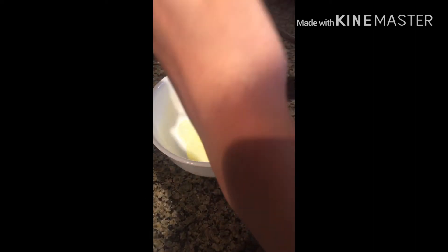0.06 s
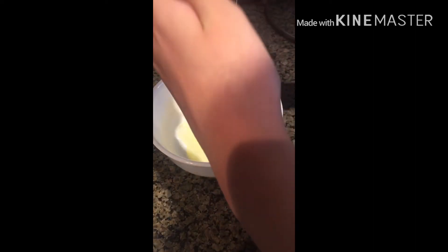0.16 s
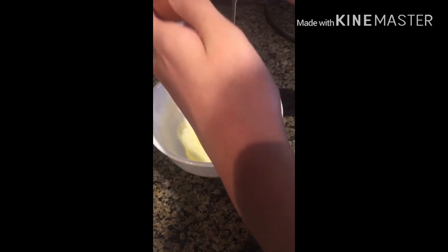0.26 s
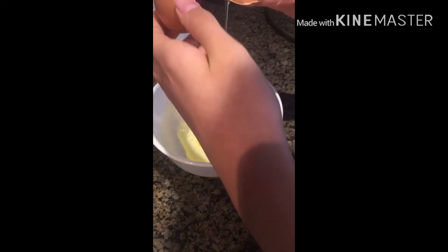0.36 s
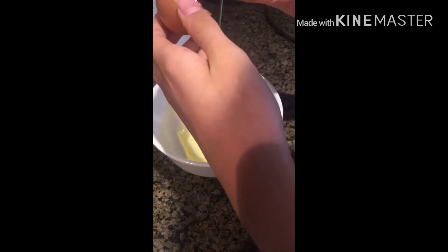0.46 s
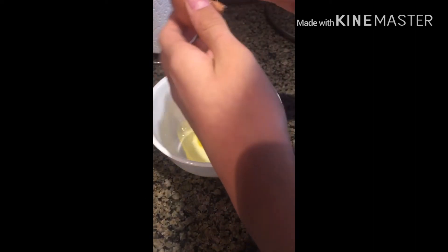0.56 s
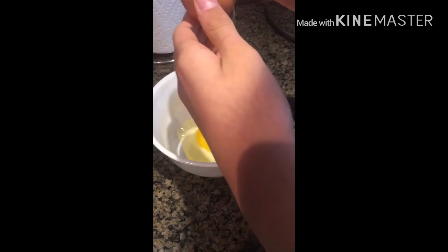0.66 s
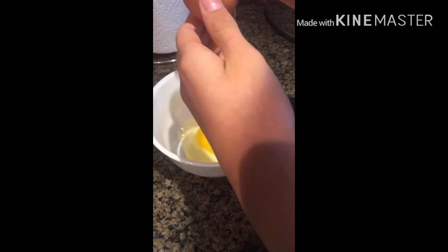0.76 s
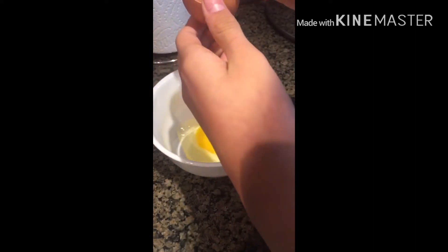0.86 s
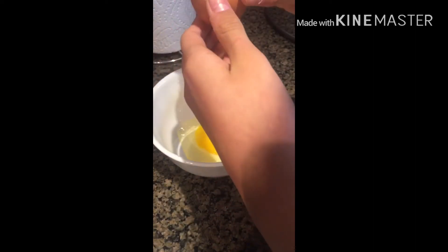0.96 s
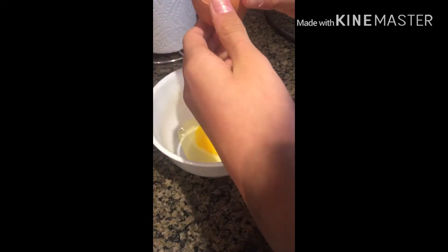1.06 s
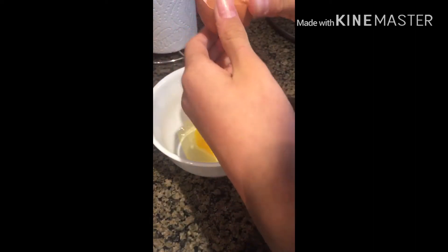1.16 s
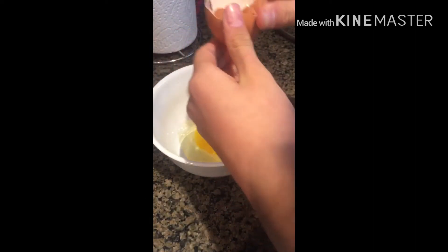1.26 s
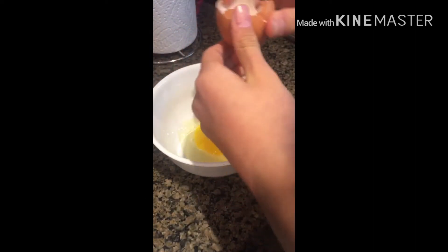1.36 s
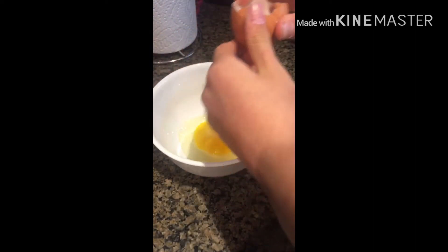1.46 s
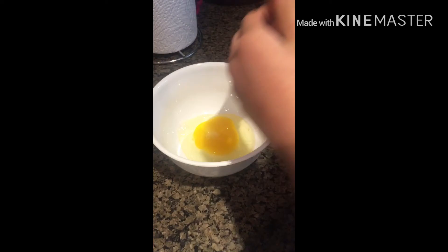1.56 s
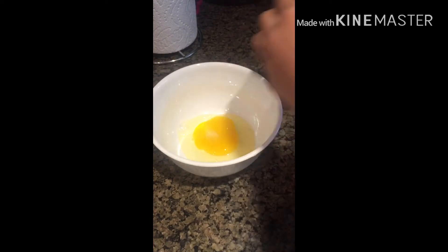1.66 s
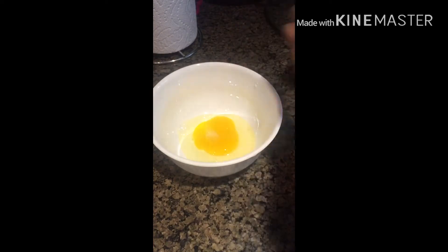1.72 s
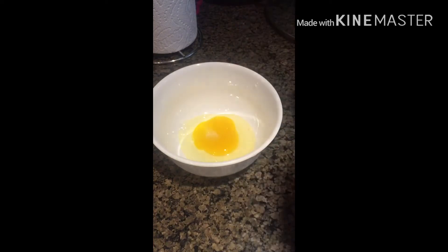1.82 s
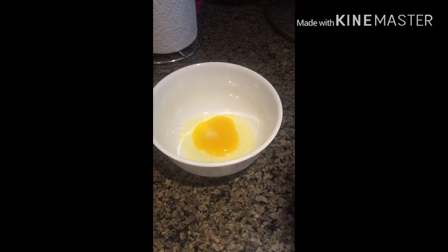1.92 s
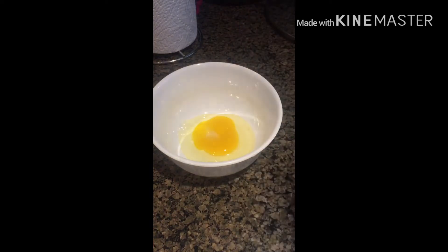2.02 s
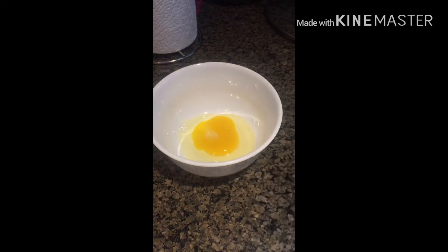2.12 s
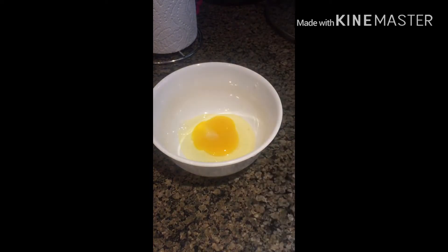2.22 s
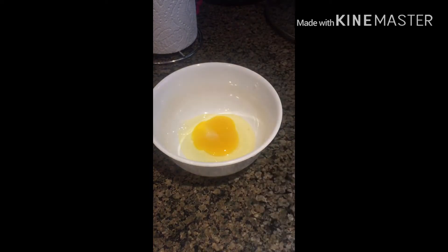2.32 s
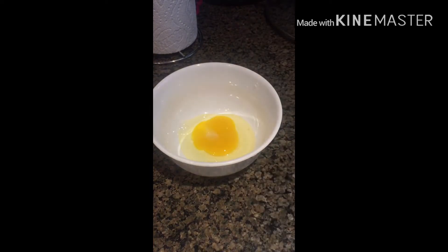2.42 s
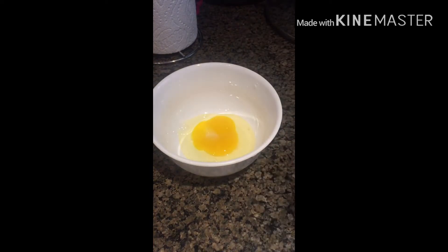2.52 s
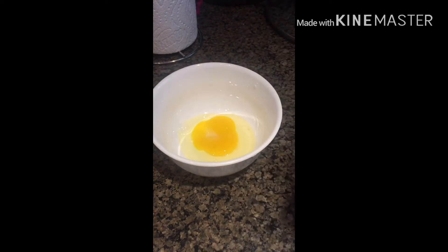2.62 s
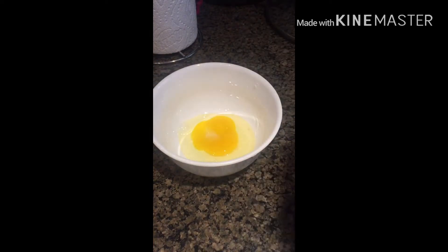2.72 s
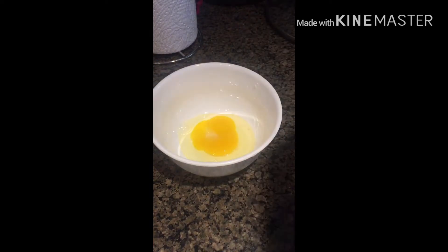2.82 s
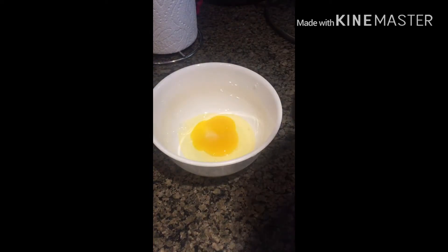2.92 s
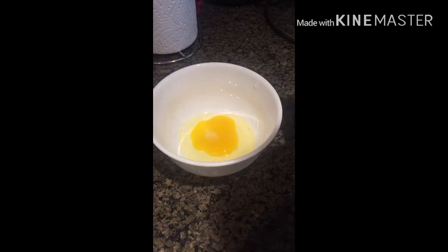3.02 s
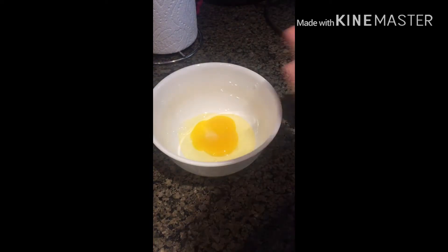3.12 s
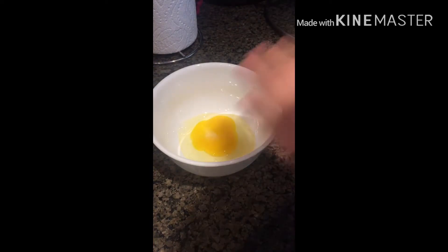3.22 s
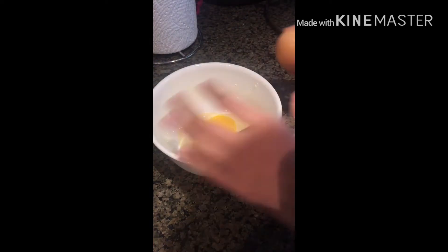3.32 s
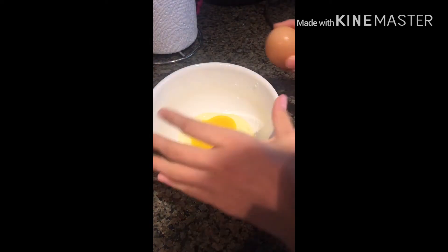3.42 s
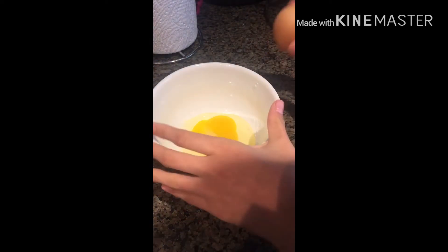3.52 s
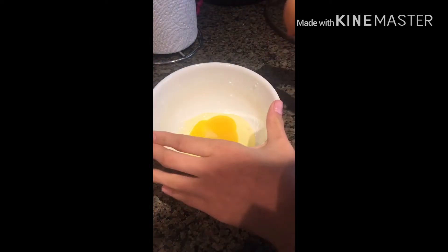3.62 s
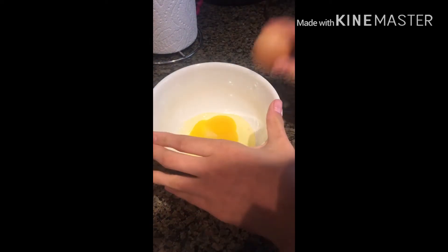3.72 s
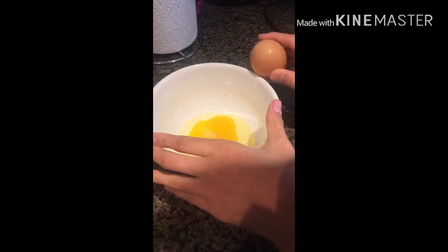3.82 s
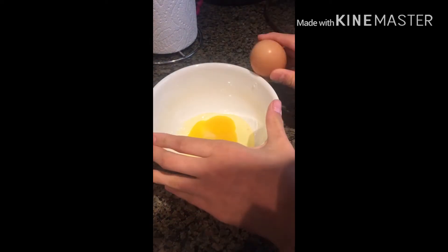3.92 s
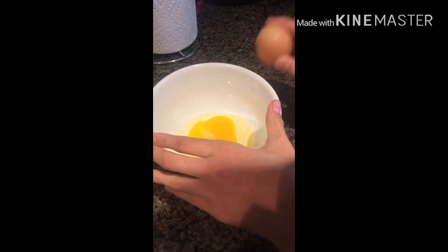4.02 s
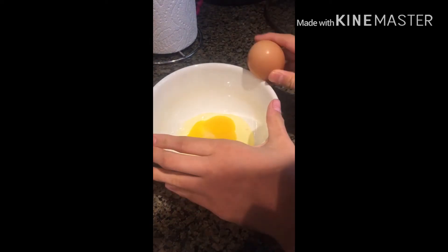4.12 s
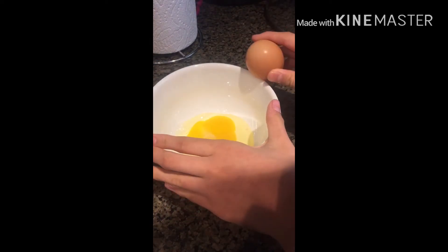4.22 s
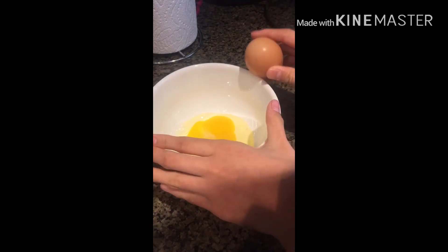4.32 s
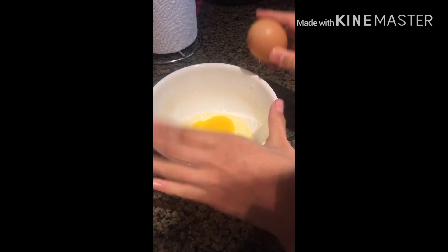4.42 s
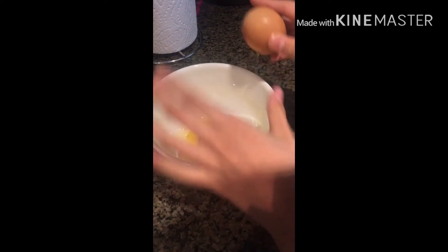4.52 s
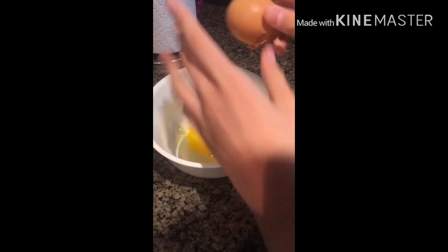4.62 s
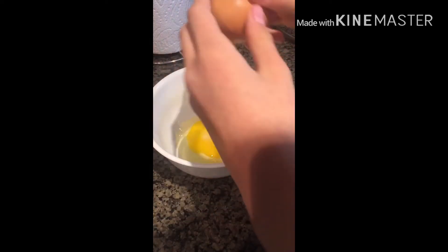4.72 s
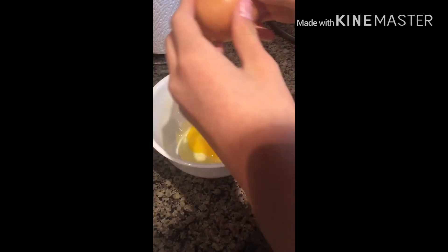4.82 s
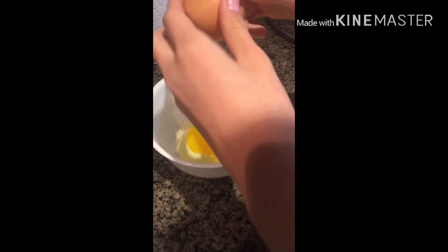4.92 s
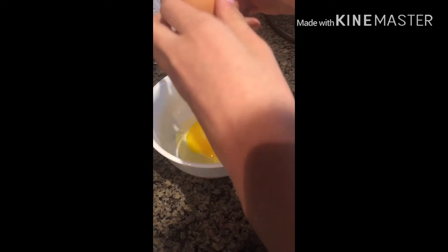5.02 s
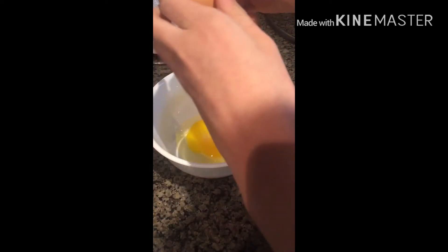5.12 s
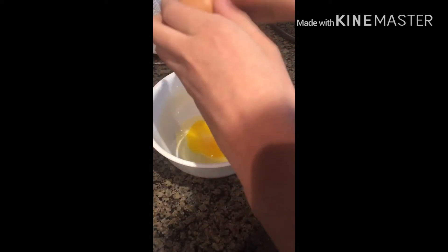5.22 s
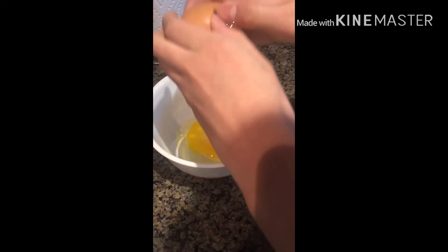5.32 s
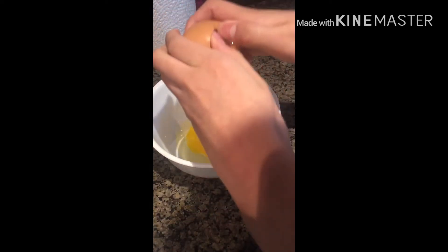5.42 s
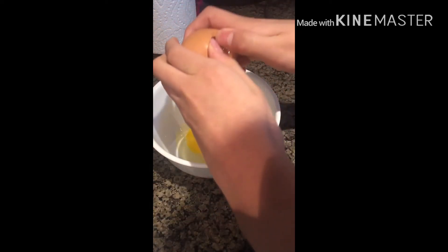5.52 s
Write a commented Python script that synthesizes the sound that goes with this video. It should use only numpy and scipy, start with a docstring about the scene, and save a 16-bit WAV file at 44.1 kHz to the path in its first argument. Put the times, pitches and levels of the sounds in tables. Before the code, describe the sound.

Eggshell is pried apart close up with brittle crackles, tossed aside with a clatter, then another egg is knocked twice on a ceramic bowl and opened.

```python
"""Cracking eggs over a bowl

Thumbs pry a shell apart close by: brittle breaks ring shell resonances and throw off bright splinters.
The empty shell is tossed aside: clacks and low thuds, then it rocks to rest. A second egg is knocked twice
on the hand-damped rim of a ceramic bowl (knock, crunch, ringing modes, counter boom) and pressed open.
Behind: sliding fingers, soft bumps, a clink, noise-built kitchen hum and hiss, short reverberation."""
import sys
import numpy as np
from scipy import signal
from scipy.fft import rfft, irfft, next_fast_len
from scipy.io import wavfile
from scipy.ndimage import map_coordinates

SR = 44100
rng = np.random.default_rng(int(sys.argv[2]) if len(sys.argv) > 2 else 0)


def transcribe(signal):
    """Save signal, clipped to [-1, 1], as a 16-bit WAV file at the path in sys.argv[1]."""
    frames = np.atleast_2d(signal).T
    limited = np.clip(frames, -1, 1)
    pcm = np.round(limited * 32767).astype(np.int16)
    wavfile.write(sys.argv[1], SR, pcm)


N = 245637
SIZE = 32768  # samples in one event
T = np.arange(SIZE) / SR
HZ = np.fft.rfftfreq(SIZE, 1 / SR)

# resonances of the opened shell, a hollow cup: [f/Hz, width/Hz, level/dB]
OPEN_SHELL = [(1028, 300, -16), (1783, 270, -5.5), (2210, 160, 2.5), (2570, 130, -1.5), (3120, 370, -5),
              (4200, 500, -13.5)]
# resonances of the splinters: [f/Hz, width/Hz, level/dB]
SPLINTER = [(5240, 530, -1.5), (6650, 940, 0), (8200, 150, 2), (9100, 860, -5), (14000, 2200, -12.5)]
# boom of the counter: [f/Hz, width/Hz, level/dB]
COUNTER = [(59.7, 20, -6.5), (91, 11, 7), (109, 16, -5.5)]


def amp(db):
    """Decibels to gain."""
    return 10 ** (np.asarray(db) / 20)


def unit(x):
    """Scale to rms 1."""
    return x / np.sqrt(np.mean(x ** 2) + 1e-20)


def blow(x):
    """Scale a transient to the energy of 3 ms at rms 1."""
    return x * np.sqrt(.003 * SR / (np.sum(x ** 2) + 1e-20))


def along(points, hz):
    """Read (f/Hz, value) points on a log-frequency axis."""
    f, v = np.transpose(points)
    return np.interp(np.log(hz + 1), np.log(f + 1), v)


def curves(rows):
    """One value per sample for each column after the time."""
    s, *cols = np.transpose(rows)
    return [np.interp(np.arange(N) / SR, s, c) for c in cols]


def wobble(rate_hz):
    """Smooth random curve with rate_hz knots a second."""
    knots = rng.standard_normal(int(N * rate_hz / SR) + 4)
    return map_coordinates(knots, [np.arange(N) * rate_hz / SR])


def add(track, s, sound):
    """Mix a sound into the track at time s."""
    part = track[max(round(s * SR), 0):][:len(sound)]
    part += sound[:len(part)]


def noise(spectrum):
    """Steady Gaussian noise of rms 1, coloured by (f/Hz, dB) points."""
    m = next_fast_len(N + 8192)
    white = rfft(rng.standard_normal(m))
    colour = amp(along(spectrum, np.fft.rfftfreq(m, 1 / SR)))
    return unit(irfft(white * colour, m)[:N])


def body(modes, pitch=1):
    """Causal response of parallel resonances of alternating sign, all shifted by pitch."""
    f = HZ / pitch
    return sum((-1) ** k * amp(db) * 1j * f * width / (centre * centre - f * f + 1j * f * width)
               for k, (centre, width, db) in enumerate(modes))


def causal(spectrum):
    """Minimum-phase response with the given colour, by folding the cepstrum."""
    cepstrum = irfft(np.log(amp(along(spectrum, HZ))))
    cepstrum[1:SIZE // 2] *= 2
    cepstrum[SIZE // 2 + 1:] = 0
    return np.exp(rfft(cepstrum))


def tilt(db_per_octave, centre_hz):
    """Small pieces and hard contacts drive higher modes more: slope from 1.6 to 4 kHz, level beyond."""
    return causal([(f, db_per_octave * np.log2(f / centre_hz)) for f in (1600, 4000)])


def small(edge_hz):
    """A small object radiates little below its edge: second-order high-pass."""
    return (1j * HZ / (edge_hz + 1j * HZ)) ** 2


def fracture(crumble_s, spiky_db=7, lead=.6):
    """Force of a fracture: one break, then a dying train of uneven micro-breaks."""
    crumble_s = max(crumble_s, 1e-4)
    spikes_db = spiky_db * np.repeat(rng.standard_normal(SIZE // 8), 8)
    breaks = rng.standard_normal(SIZE) * amp(spikes_db)
    force = breaks * np.exp(-(T / crumble_s) ** 2)
    force /= np.linalg.norm(force)
    force[0] += lead * (0.0023 / crumble_s) ** 1.6  # a quick fracture is nearly one clean snap
    return force


def running_crack(rise_s, fall_s):
    """Force of a crack running in uneven steps that swell to the main break, then die away."""
    crumble_s = .0034
    swell_db_per_s, end_db = 850, -19
    jitter, scatter_db = .22, 1.5  # timing jitter as a share of the step spacing
    steps = [(rise_s * k / 3, rise_s / 3) for k in range(3)]
    steps += [(rise_s, 0)]
    steps += [(rise_s + fall_s * (k + 1) / 6, fall_s / 6) for k in range(6)]
    force = np.zeros(SIZE)
    for (s, spacing_s), (late, uneven) in zip(steps, rng.standard_normal((len(steps), 2))):
        db = np.interp(s, [0, rise_s, rise_s + fall_s], [-swell_db_per_s * rise_s, 0, end_db])
        db += scatter_db * uneven
        step = blow(fracture(crumble_s, spiky_db=6.5, lead=1.5))
        add(force, s + jitter * spacing_s * late, amp(db) * step)
    return force


def struck(force, response):
    """A force passing through a resonating body, faded to silence and energy-scaled."""
    return blow(irfft(rfft(force) * response) * np.cos(np.pi / 2 * T / T[-1]) ** 2)


def thump(modes, contact_s=.004):
    """A soft push, an exponentially dying force, sets a body booming."""
    return struck(np.exp(-T / max(contact_s, 1e-4)), body(modes) * small(45))


def ring(modes, scatter_db=1):
    """Decaying sine modes of ceramic, at slightly new strengths each time."""
    total = 0
    for hz, t60_s, db in modes:
        level_db = db + scatter_db * rng.standard_normal() - 60 * T / t60_s
        total = total + amp(level_db) * np.sin(2 * np.pi * hz * T)
    return blow(total)


def echo(x, decay, build_s, size):
    """Convolve with fresh diffuse noise that builds up, then dies at each frequency's own t60."""
    hz, t, z = signal.stft(rng.standard_normal(size), SR, nperseg=256)
    z = z * np.exp(-np.log(1000) * t / along(decay, hz)[:, None])
    tail = signal.istft(z, SR, nperseg=256)[1][:size]
    tail = tail * (1 - np.exp(-T[:size] / build_s))
    return signal.fftconvolve(x, tail / np.linalg.norm(tail))[:SIZE]


def placed(x, near_db, room_db):
    """Direct sound, scatter from nearby surfaces and the kitchen's reverberation."""
    # counter, hands and bowl wall: [f/Hz, t60/s]
    nearby = [(200, 0.11), (2500, 0.058), (14000, 0.046)]
    # kitchen: [f/Hz, t60/s]
    kitchen = [(100, 0.35), (500, 0.71), (2300, .57), (4000, .6), (6500, .5), (10000, .33), (16000, 0.18)]
    scatter = echo(x, nearby, build_s=0.0023, size=4096)
    reverb = echo(x, kitchen, build_s=0.01, size=28672)
    return x + amp(near_db) * scatter + amp(room_db) * reverb


def prying(snaps, cracks, shell, centre_hz, near_db, room_db):
    """Each fracture rings the shell's fixed modes, tilted by its pitch, and throws off bright splinters."""
    snap_crumble_s, slower_s_per_db = .0006, .00008  # weaker snaps crumble for longer
    out = np.zeros(N)
    cup = body(shell) * small(200)
    splinters = body(SPLINTER) * small(2500)
    breaks = []
    for s, ring_db, splinter_db, hz in snaps:
        force = fracture(snap_crumble_s - slower_s_per_db * ring_db, spiky_db=7.0, lead=1.4)
        breaks.append((s, force, ring_db, splinter_db, hz))
    for s, rise_s, fall_s, *rest in cracks:
        breaks.append((s, running_crack(rise_s, fall_s), *rest))
    for s, force, ring_db, splinter_db, hz in breaks:
        favour = tilt(40 * np.log2(hz / centre_hz), centre_hz)
        snap = amp(ring_db) * struck(force, cup * favour)
        snap += amp(splinter_db) * struck(force, splinters)
        add(out, s, placed(snap, near_db, room_db))
    return out


def first_egg():
    """The first shell, pried open: a hollow cup with ringing modes."""
    # single snaps: [t/s, shell ring level/dB, splinter level/dB, pitch f/Hz]
    snaps = [(.1333, -32.5, -40, 3050), (.1616, -41.5, -32.5, 3000), (.319, -39, -43, 2860),
             (.601, -21.5, -29, 2690), (.6283, -35.5, -36, 2600), (.6487, -22, -28, 2406),
             (.6935, -28, -37, 2200), (.7768, -25.5, -38, 2577), (.867, -38.5, -47, 2874),
             (.9393, -21, -31, 2310), (1.069, -22, -26, 2350), (1.086, -19, -30.5, 2170),
             (1.135, -18, -20.5, 2284), (1.163, -30, -31.5, 2368), (1.188, -27.5, -28.5, 2470),
             (1.2017, -20.5, -33.5, 2260), (1.224, -32.5, -37, 2350), (1.2578, -14.5, -26, 2430),
             (1.3143, -10, -21.5, 2420), (1.378, -39.5, -36, 2350), (1.507, -44, -42, 2830),
             (1.7704, -43, -52.5, 2183)]
    # running cracks: [t/s, rise/s, fall/s, shell ring level/dB, splinter level/dB, pitch f/Hz]
    cracks = [(.661, .007, .011, -20, -39, 2330), (.711, .009, .04, -20, -39.5, 2280),
              (.889, .0185, .042, -11.5, -14.8, 2680), (1.104, 0.0091, .021, -16.5, -20.5, 2300),
              (1.242, .004, .014, -10, -8.5, 2400), (1.2814, .0063, .019, -5.5, -8, 2630)]
    return prying(snaps, cracks, OPEN_SHELL, centre_hz=2480, near_db=-7.5, room_db=-23)


def second_egg():
    """The second shell, pressed open: its contents damp the modes."""
    # single snaps: [t/s, shell ring level/dB, splinter level/dB, pitch f/Hz]
    snaps = [(5.06, -49, -42, 2590), (5.112, -41, -45, 3000), (5.178, -37.5, -37, 3230),
             (5.202, -23.5, -17, 3054), (5.2216, -19, -19.5, 3296), (5.421, -35.5, -33.5, 3800)]
    # running cracks: [t/s, rise/s, fall/s, shell ring level/dB, splinter level/dB, pitch f/Hz]
    cracks = [(5.125, .003, .005, -31, -25.5, 3535), (5.193, .009, .024, -20, -21, 3300)]
    # resonances of the full shell: [f/Hz, width/Hz, level/dB]
    full_shell = [(308, 60, 0), (1380, 830, -3), (2270, 470, -1.5), (3640, 820, 1)]
    return prying(snaps, cracks, full_shell, centre_hz=3200, near_db=-7.5, room_db=-24.5)


def ticks(count=7):
    """Tiny random breaks, count of them spread over each spell of pressing."""
    # thumbs pressing: [start t/s, end t/s, level/dB]
    pressing = [(.02, .58, -51.5), (0.799, 1.099, -47), (5.05, 5.451, -55)]
    scatter_db = 3
    out = np.zeros(N)
    colour = body(OPEN_SHELL) * small(250) + amp(-4) * body(SPLINTER) * small(2500)
    for start, end, db in pressing:
        for k in range(count):
            s = start + (end - start) * (k + rng.random()) / count
            level = amp(db + scatter_db * rng.standard_normal())
            add(out, s, level * struck(fracture(.004, spiky_db=6, lead=1), colour))
    return out


def tossed_shell():
    """The empty shell hits, tumbles and rocks to rest in a boomy hollow."""
    # contacts: [t/s, clack level/dB, crumbling time/s, thud level/dB, hardness tilt/(dB/octave)]
    landing = [(2.4225, -33.5, .0033, -55, 0), (2.426, -4.5, 0.0021, -31, 4), (2.4288, -6, .006, -25, 4),
               (2.4387, -16.5, .005, -43, 2), (2.4515, -21, 0.0082, -17, -3),
               (2.462, -8, 0.0055, -16.5, -2.5), (2.4706, -8, .0045, -19, -2),
               (2.4755, -9.5, .0027, -18.5, -1)]
    # resonances of shell and hollow: [f/Hz, width/Hz, level/dB]
    clack_modes = [(617, 160, -14.5), (915, 140, -12), (1304, 170, -11), (1700, 97, -0.5), (2105, 130, 0.5),
                   (2320, 130, -0.5), (2660, 180, -0.5), (3130, 140, -5), (3380, 300, -3), (4240, 810, -10),
                   (5600, 820, -11), (8500, 3500, -20.5), (12400, 6500, -24)]
    # boom of the hollow: [f/Hz, width/Hz, level/dB]
    thud_modes = [(55.1, 16, -1.5), (81.9, 15, -3), (104, 16, -4.5), (156, 37, -10), (308.5, 50, -10),
                  (422, 79, -12.5)]
    rock_gap_s, rock_crumble_s = .027, 0.007
    rock_clack_db, rock_thud_db, rock_loss_db = -31, -28, 4  # first contact, loss per further one
    out = np.zeros(N)
    colour = body(clack_modes) * small(250)
    rocking = []
    for k in range(8):
        s = landing[-1][0] + rock_gap_s * (k + 1)
        loss_db = rock_loss_db * k
        rocking.append((s, rock_clack_db - loss_db, rock_crumble_s, rock_thud_db - loss_db, 0))
    for s, clack_db, crumble_s, thud_db, hardness in [*landing, *rocking]:
        force = fracture(crumble_s, spiky_db=4, lead=.9)
        clack = amp(clack_db) * struck(force, colour * tilt(hardness, centre_hz=2500))
        thud = amp(thud_db) * thump(thud_modes, contact_s=0.00022)
        add(out, s, placed(clack + thud, near_db=-7.5, room_db=-15))
    return out


def bowl(spot):
    """The bowl's ring; mode strengths depend on where between two rim spots it is struck."""
    # ring modes: [f/Hz, t60/s, level at spot 0/dB, level at spot 1/dB]
    modes = [(855, .22, -4, -1), (1388, .55, 1, -9), (2543, .55, -24, 1), (2584, .5, -9, -12),
             (4075, .42, -5, -4), (5640, .25, -14, -14), (5950, .28, -10, -7), (6230, .22, -15, -9),
             (7900, .15, -19, -13), (10030, .22, -21, -12), (11110, .2, -16, -11), (12870, .2, -30, -14)]
    return ring([(hz, t60_s, np.interp(spot, [0, 1], [one, other])) for hz, t60_s, one, other in modes])


def egg_on_rim():
    """The shell caves in on the rim: dull knock, crunch, bowl ring and a thump through the counter."""
    # two taps, then the egg lifted off the rim: [t/s, knock level/dB, crunch level/dB,
    #   crunch pitch ratio, counter thump level/dB, egg squash level/dB, bowl ring level/dB, rim spot 0-1]
    contacts = [(3.7514, -8, -9.5, 0.98, -18, -25, -20, .05),
                (4.111, -9.5, -10, 0.99, -18.5, -18.5, -24.5, .92),
                (4.331, -49, -48.5, 0.99, -58, -58, -43.5, 0.4)]
    # touch, blow, shell caving in: [delay/s, shell level/dB, push on the bowl level/dB]
    stages = [(-.0045, -32, -24.5), (0, 0, -7), (.0053, -6, -1)]
    # egg on the rim: [f/Hz, width/Hz, level/dB]
    knock_modes = [(497, 160, -11.5), (700, 70, -6), (870, 90, -1.5), (1180, 300, -6), (1400, 220, -1),
                   (1700, 190, -1.5), (2420, 610, -13)]
    # shell crushed on the glaze: [f/Hz, width/Hz, level/dB]
    crunch_modes = [(2680, 450, -7.5), (4100, 370, 1), (5980, 500, 2), (7860, 1300, -7.5),
                    (9850, 600, -2.5), (11350, 560, -6), (13530, 2400, -14)]
    # full egg giving way: [f/Hz, width/Hz, level/dB]
    squash_modes = [(215, 50, -1), (270, 45, -1), (444, 38, 1)]
    out = np.zeros(N)
    for s, knock_db, crunch_db, pitch, thump_db, squash_db, ring_db, spot in contacts:
        add(out, s, amp(ring_db) * bowl(spot))
        for delay_s, shell_db, push_db in stages:
            knock_force = fracture(0.0041, spiky_db=3.5, lead=1.8)
            knock = amp(knock_db) * struck(knock_force, body(knock_modes) * small(250))
            crunch_force = fracture(.005, spiky_db=11.0, lead=1.0)
            crunch = amp(crunch_db) * struck(crunch_force, body(crunch_modes, pitch) * small(1700))
            boom = amp(thump_db) * thump(COUNTER, contact_s=.0004)
            boom += amp(squash_db) * thump(squash_modes, contact_s=0.00032)
            contact = amp(shell_db) * (knock + crunch) + amp(push_db) * boom
            add(out, s + delay_s, placed(contact, near_db=-7.5, room_db=-21.5))
    return out


def nudges():
    """A steadying hand: soft counter thumps, and fingers on the glaze waking a few bowl modes."""
    # bumps on the counter: [t/s, level/dB]
    hand_bumps = [(3.079, -32.5), (3.139, -36.5), (3.308, -43), (3.451, -38)]
    # fingers sliding on the glaze: [t/s, level/dB]
    slides = [(3.451, -49), (3.529, -46.5), (4.311, -41.5), (4.411, -51.5)]
    # bowl modes they wake: [f/Hz, t60/s, level/dB]
    glaze_modes = [(2584, 0.31, -1), (5800, 0.17, -3.5), (7830, 0.12, -8), (10030, .2, -6.5),
                   (11200, .2, -9.5)]
    out = np.zeros(N)
    for s, db in hand_bumps:
        add(out, s, amp(db) * thump(COUNTER, contact_s=0.0045))
    swell = 1 - np.exp(-T / 0.016)  # a sliding finger feeds the modes gradually
    for s, db in slides:
        add(out, s, amp(db) * swell * ring(glaze_modes))
    return out


def fingers():
    """Skin hisses over the fine grain of the shell and the cupped palm rustles: gated, uneven noise."""
    # strokes: [t/s, length/s, hiss level/dB, palm rustle level/dB]
    strokes = [(0.036, 0.33, -58, -68.5), (.83, .67, -58, -66), (5.046, .2, -52, -60.5),
               (5.289, 0.046, -58, -49.5), (5.395, .025, -54, -57), (5.494, .08, -54, -47.5)]
    # skin hiss spectrum: [f/Hz, level/dB]
    skin_spectrum = [(1000, -13), (3500, -2), (5500, -5.5), (7200, -2), (8800, -1), (10000, -8),
                     (16000, -11)]
    # palm rustle spectrum: [f/Hz, level/dB]
    palm_spectrum = [(100, -12), (230, 4), (330, 3), (600, -5), (1000, -6), (1350, -4), (1900, -16),
                     (5000, -30)]
    attack_s, release_s = .025, 0.039  # the grip builds ahead of t, lets go after the length
    t = np.arange(N) / SR
    hiss, rustle = np.zeros(N), np.zeros(N)
    for s, length_s, hiss_db, palm_db in strokes:
        stroke = np.clip(1 + (t - s) / attack_s, 0, 1)
        stroke *= np.exp(-np.maximum(t - s - length_s, 0) / release_s)
        hiss += amp(hiss_db) * stroke
        rustle += amp(palm_db) * stroke
    grip = amp(2.2 * wobble(250))
    return hiss * unit(noise(skin_spectrum) * grip) + rustle * unit(noise(palm_spectrum) * grip)


def small_sounds():
    """Distant bumps and a clink of crockery arrive with strong reverberation."""
    # soft bumps: [t/s, level/dB]
    far_bumps = [(.189, -35.5), (.212, -39.5), (1.834, -38.5)]
    # bump spectrum: [f/Hz, level/dB]
    bump_spectrum = [(150, -21), (310, 13.5), (550, -0.5), (900, 2.5), (1300, 7), (1900, -13), (6000, -16),
                     (14000, -33.5)]
    # light clink: [t/s, level/dB]
    clinks = [(0.3879, -35), (0.3914, -31)]
    # crockery resonances: [f/Hz, width/Hz, level/dB]
    crockery = [(1250, 21, 0), (1400, 140, 0.5), (2430, 120, -5.5), (2660, 133, 3.5), (2710, 14, 7)]
    out = np.zeros(N)
    colour = causal(bump_spectrum)
    for s, db in far_bumps:
        bump = struck(fracture(.005, spiky_db=3.0), colour)
        add(out, s, amp(db) * placed(bump, near_db=-2.5, room_db=0))
    for s, db in clinks:
        clink = struck(fracture(0.0025, lead=1.74), body(crockery))
        add(out, s, amp(db) * placed(clink, near_db=-23, room_db=-6.5))
    return out


def ambience():
    """Hum and fainter hiss, shaped noise: the hum wavers; both sink after the first rim tap, then recover."""
    # room level: [t/s, level/dB]
    room_level = [(0, -49), (2.3, -47), (2.9, -50), (3.7, -49), (3.9, -55), (4.8, -53.5), (5.57, -49.5)]
    # hum spectrum: [f/Hz, level/dB]
    hum_spectrum = [(15, -44), (25, -13), (37, -7.5), (48, 0), (96, -2), (134, -2.5), (184, 2), (248, -10),
                    (372, -4.5), (458, -17), (583, -14.5), (775, -26.5), (900, -23.5), (1170, -54),
                    (1980, -120)]
    # hiss spectrum: [f/Hz, level/dB]
    hiss_spectrum = [(400, -20.5), (700, -3.5), (1200, 1.5), (1600, -2.5), (4000, -9.5), (9500, -14),
                     (10500, -17), (16000, -17.5)]
    hiss_db = -9  # against the hum
    level_db, = curves(room_level)
    hum = amp(1.1 * wobble(15)) * noise(hum_spectrum)
    return amp(level_db) * (hum + amp(hiss_db) * noise(hiss_spectrum))


def scene():
    """Both eggs, the bowl and the kitchen, in mono."""
    eggs = first_egg() + second_egg() + ticks()
    impacts = tossed_shell() + egg_on_rim() + nudges()
    background = fingers() + small_sounds() + ambience()
    return (eggs + impacts + background)[None]


def record(dry):
    """Peaks saturate softly towards full scale; nothing passes above the band limit."""
    top_hz = 16000
    saturated = dry / (1 + np.abs(dry) ** 6) ** (1 / 6)
    m = next_fast_len(N + 8192)
    passband = np.fft.rfftfreq(m, 1 / SR) < top_hz
    return irfft(rfft(saturated, m) * passband, m)[..., :N]


dry = scene()
out = record(dry)
transcribe(out)
```